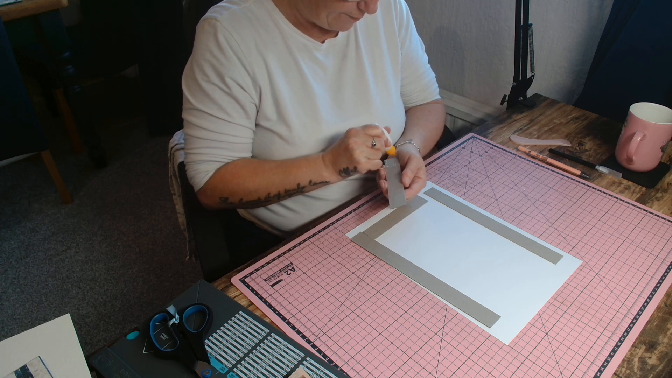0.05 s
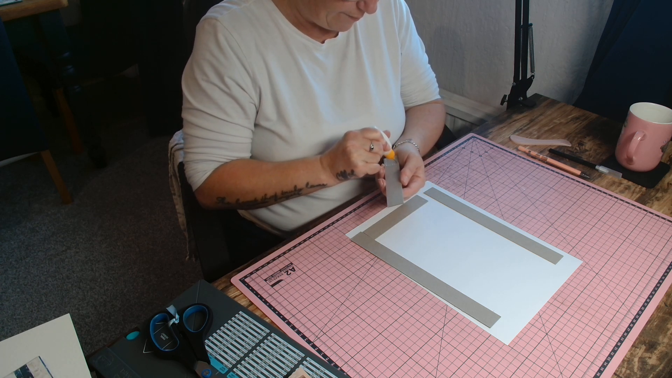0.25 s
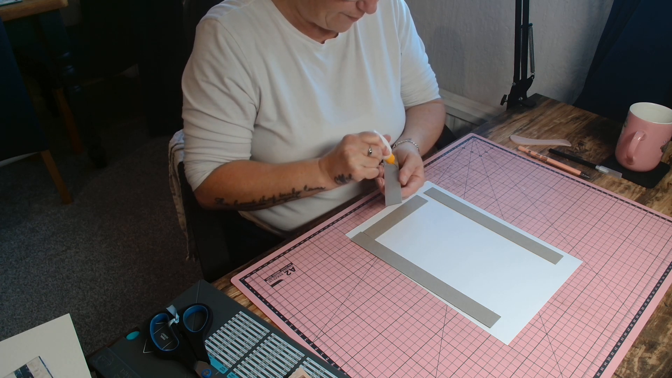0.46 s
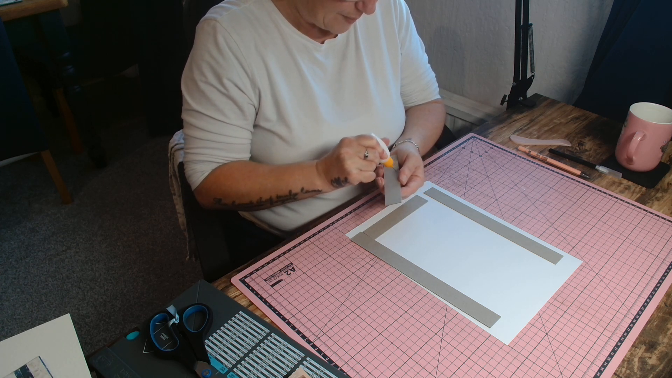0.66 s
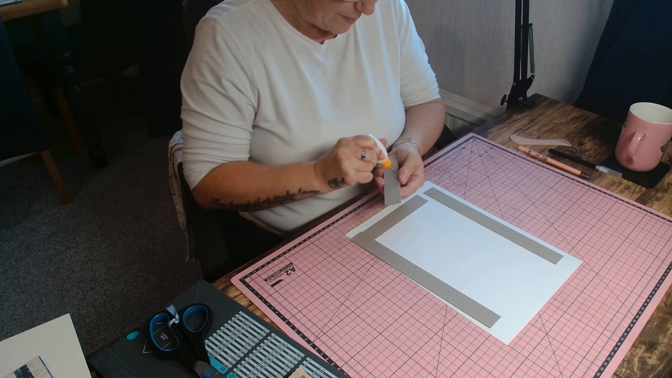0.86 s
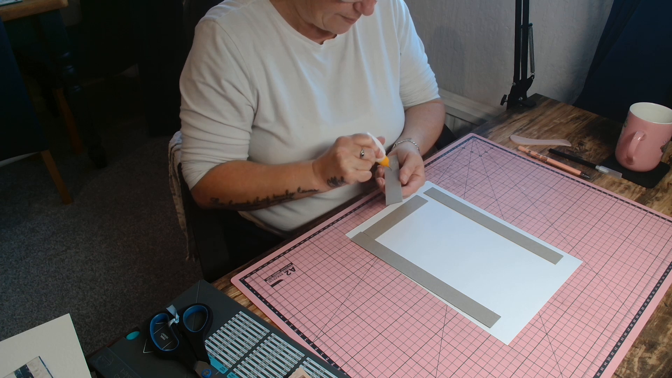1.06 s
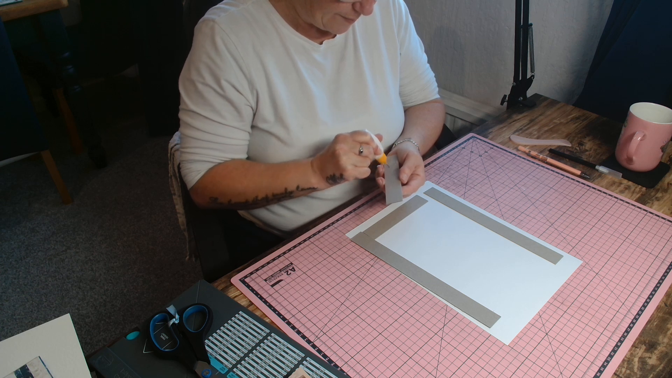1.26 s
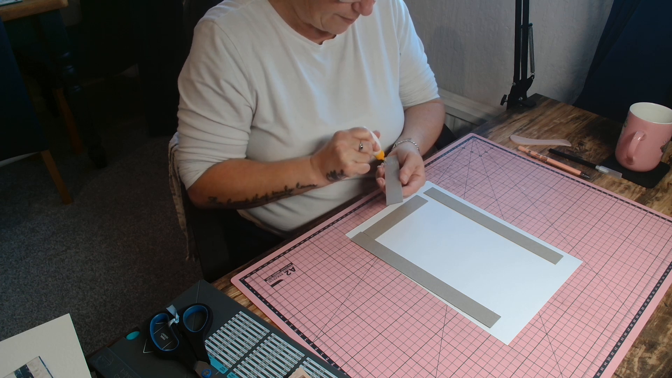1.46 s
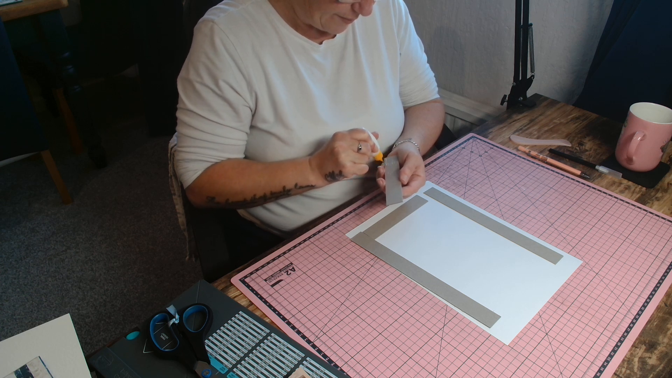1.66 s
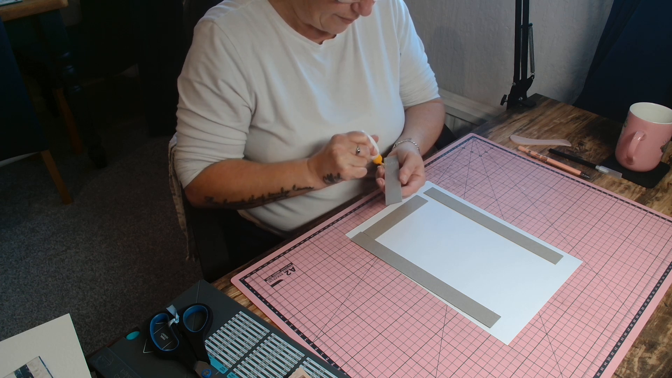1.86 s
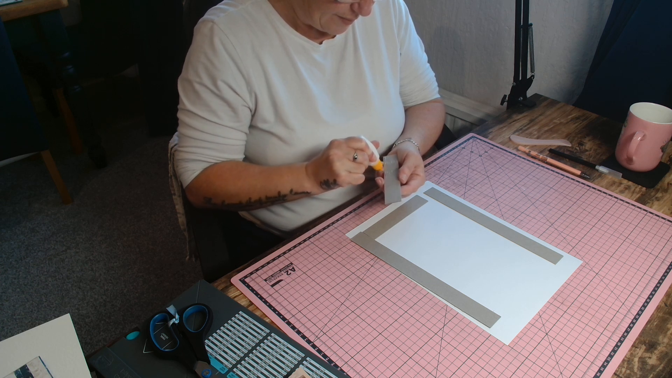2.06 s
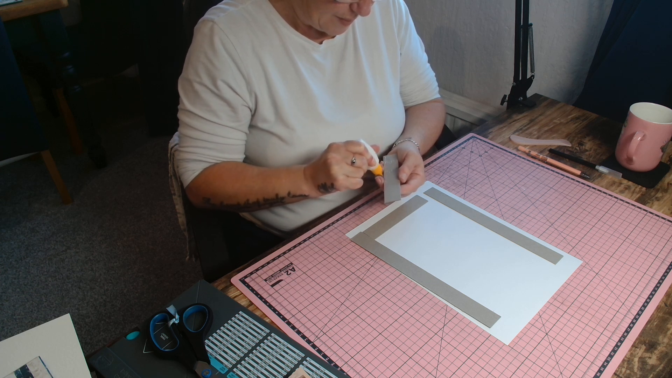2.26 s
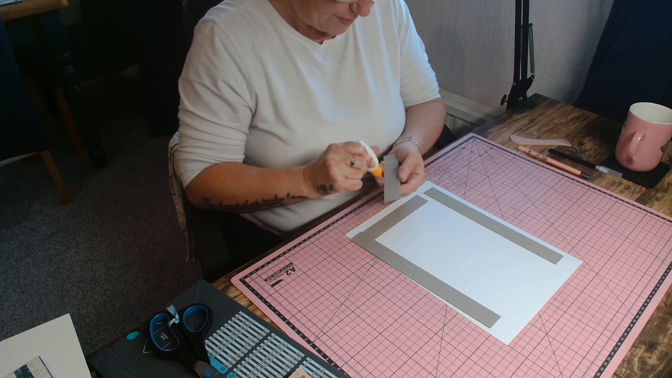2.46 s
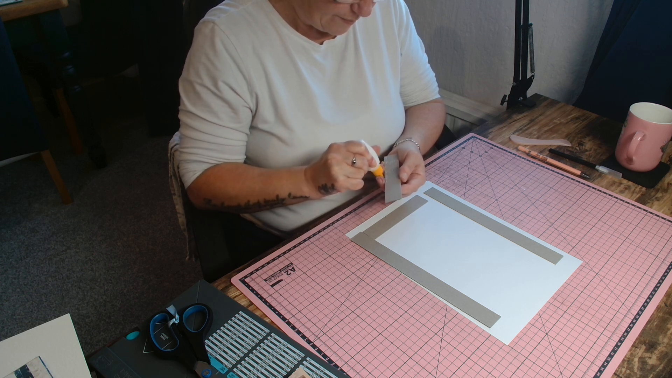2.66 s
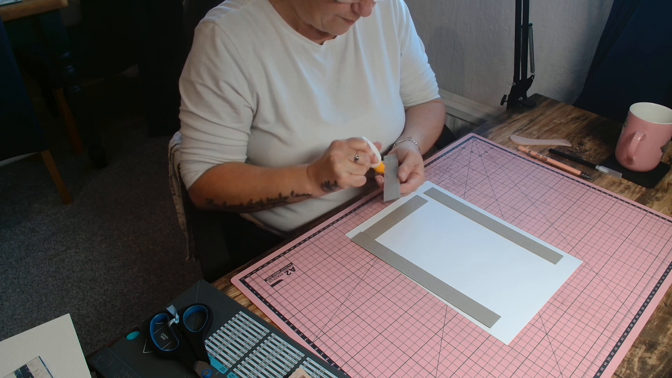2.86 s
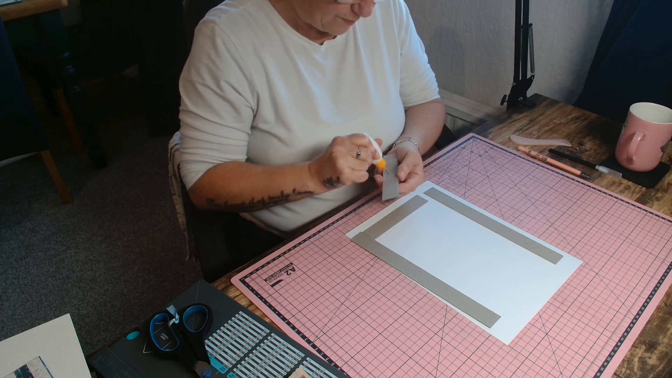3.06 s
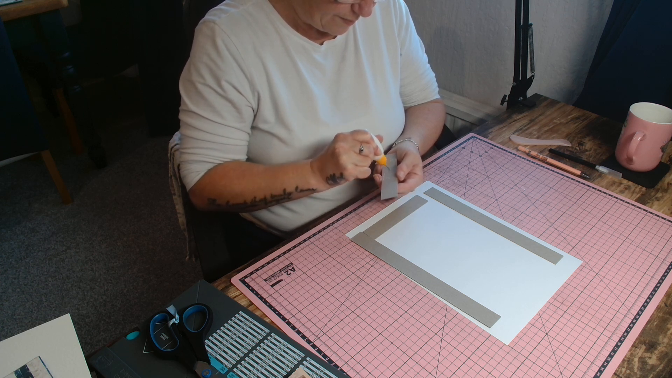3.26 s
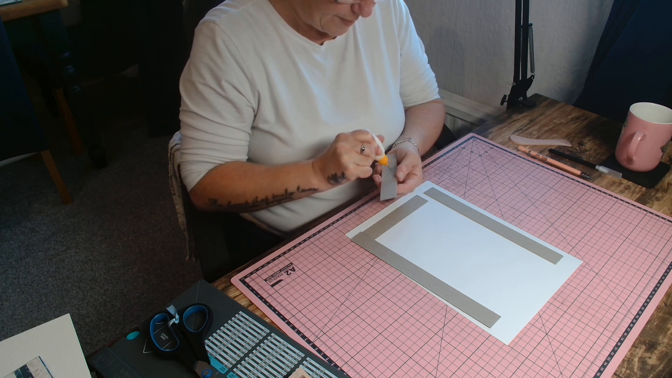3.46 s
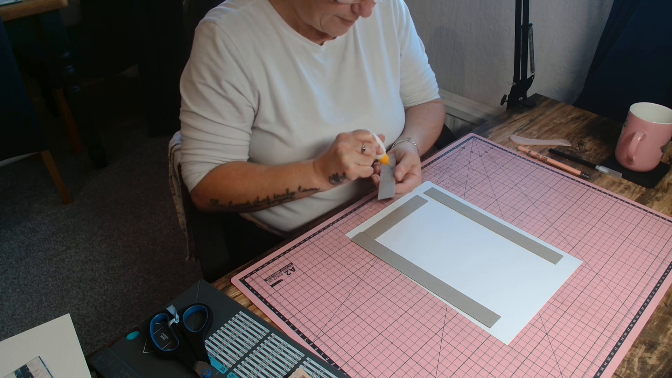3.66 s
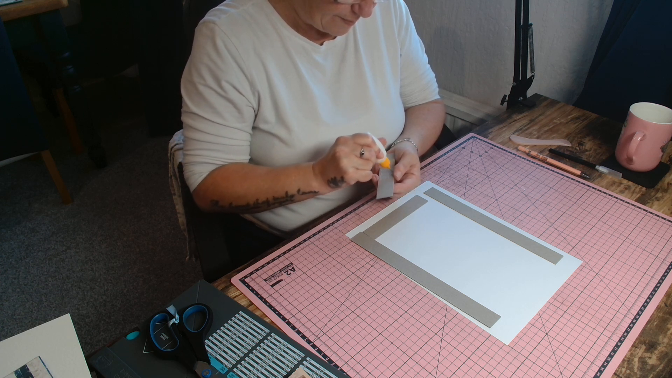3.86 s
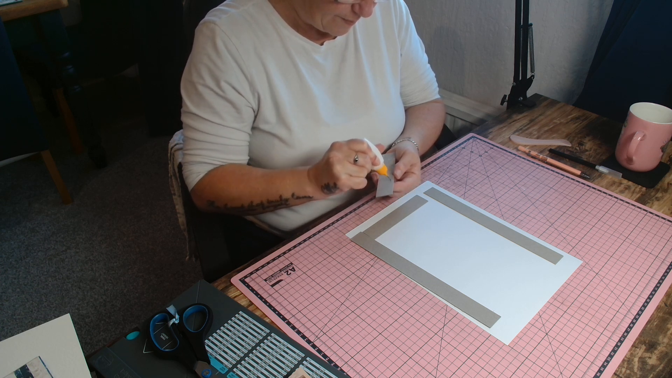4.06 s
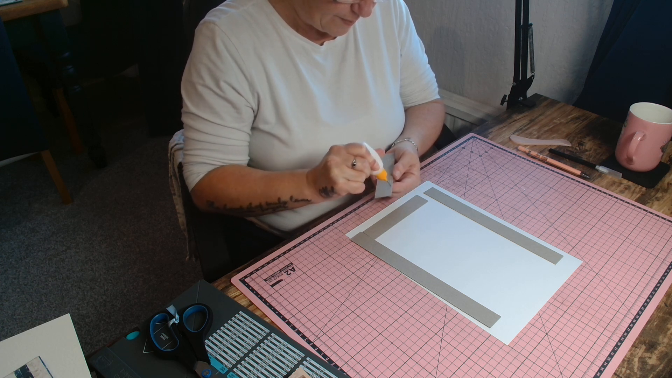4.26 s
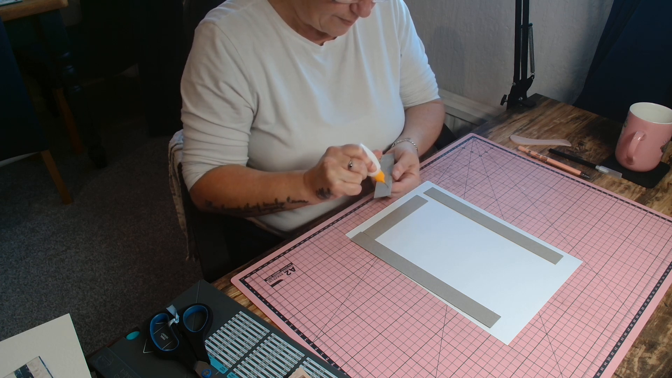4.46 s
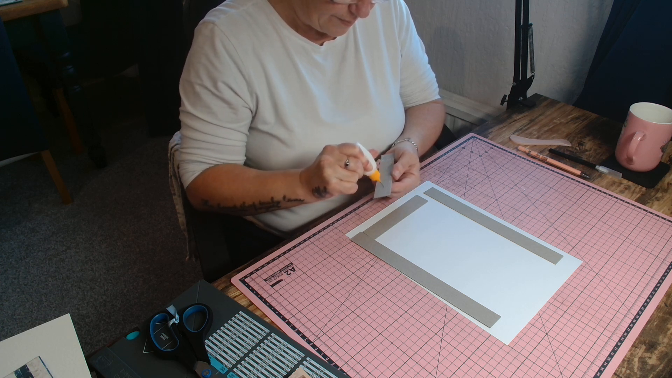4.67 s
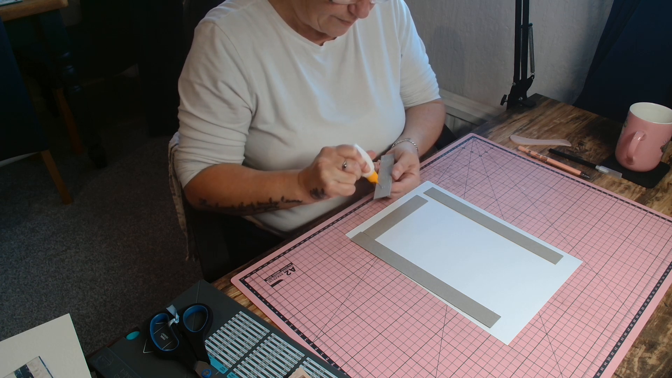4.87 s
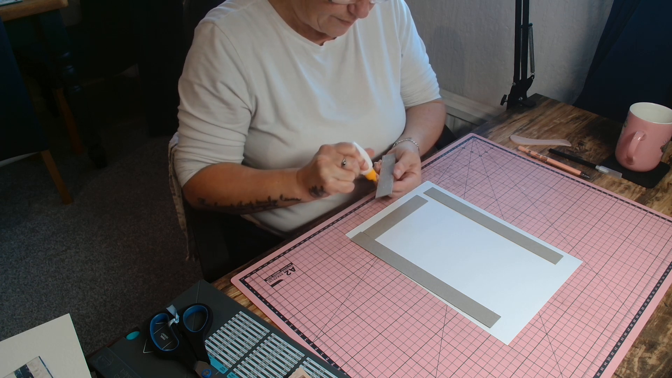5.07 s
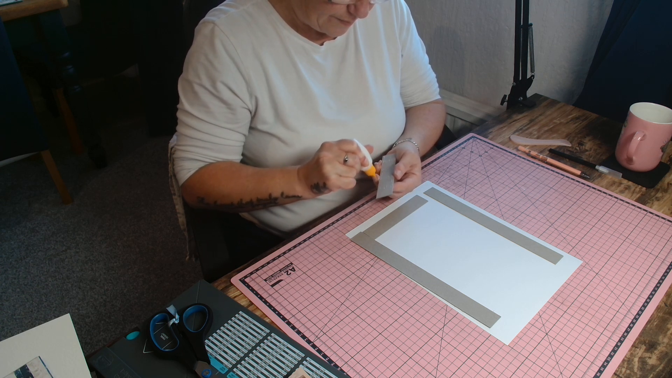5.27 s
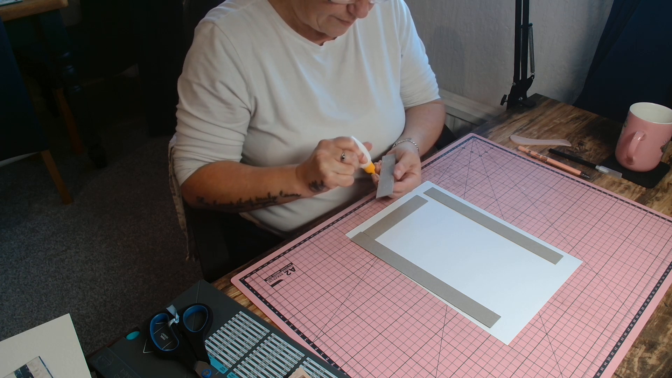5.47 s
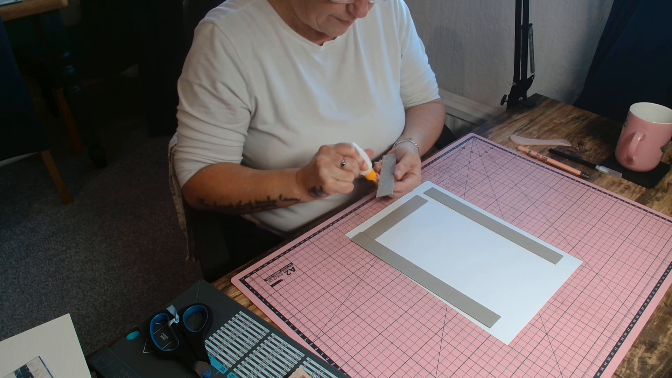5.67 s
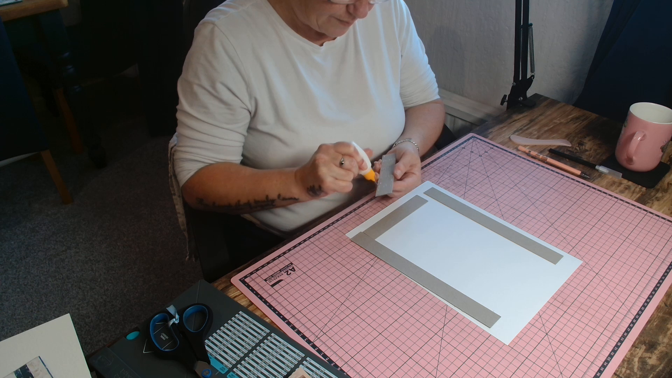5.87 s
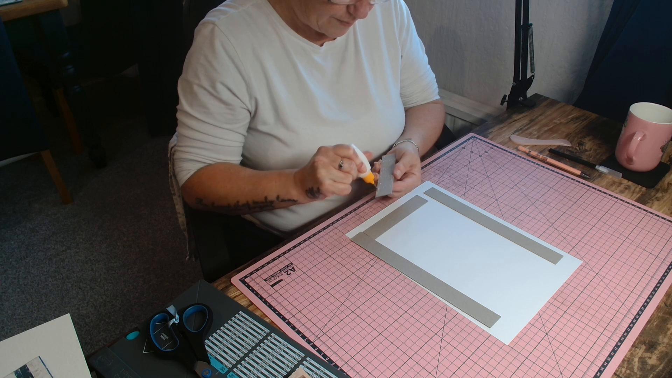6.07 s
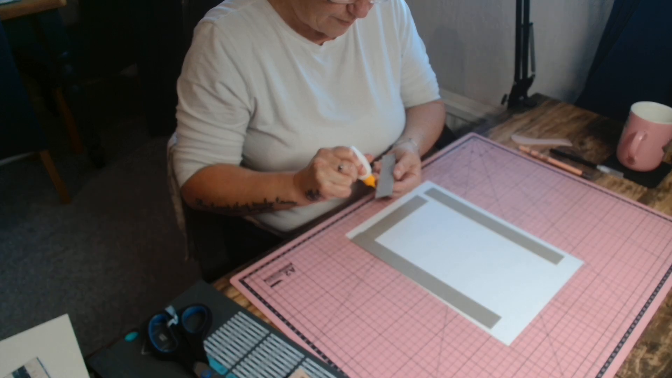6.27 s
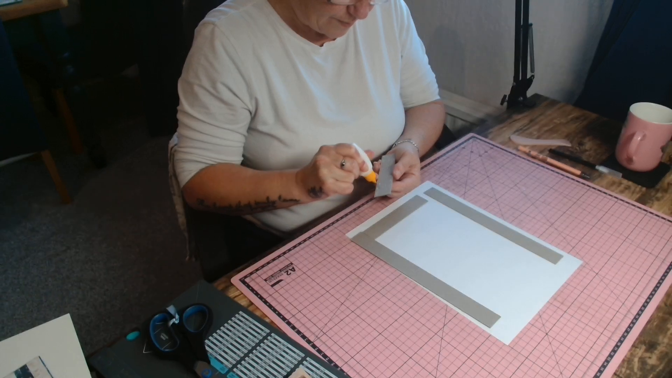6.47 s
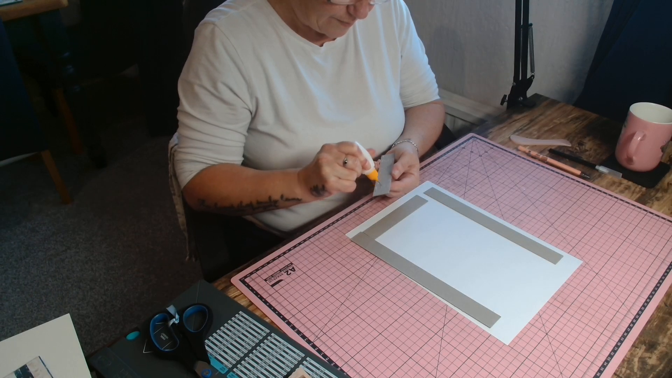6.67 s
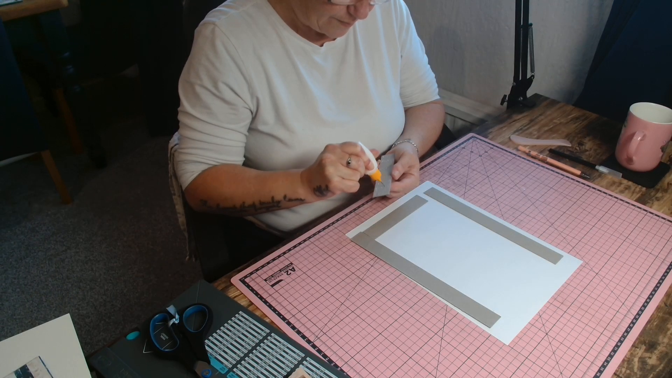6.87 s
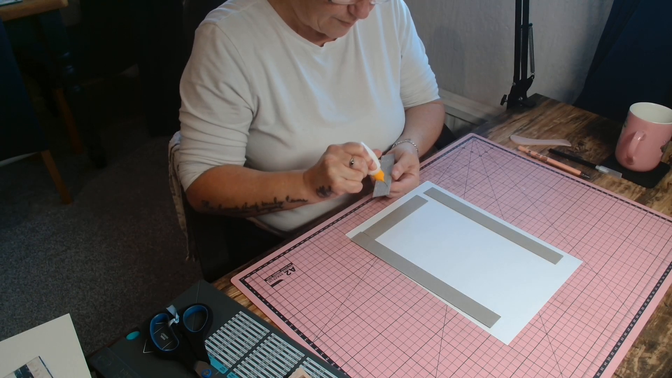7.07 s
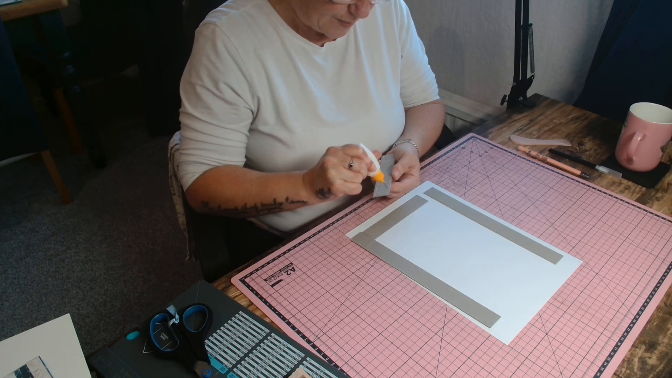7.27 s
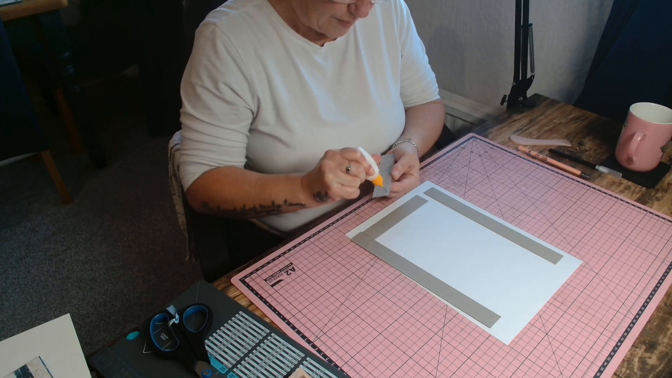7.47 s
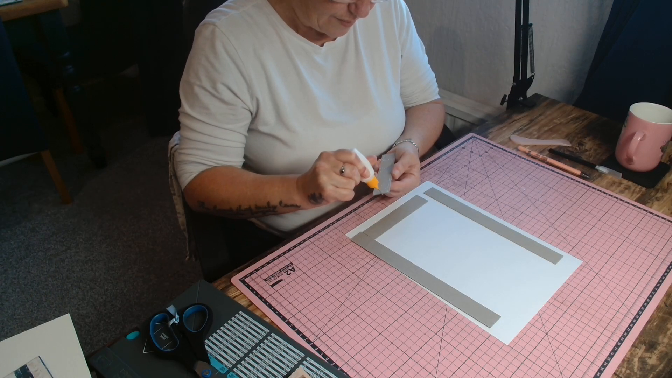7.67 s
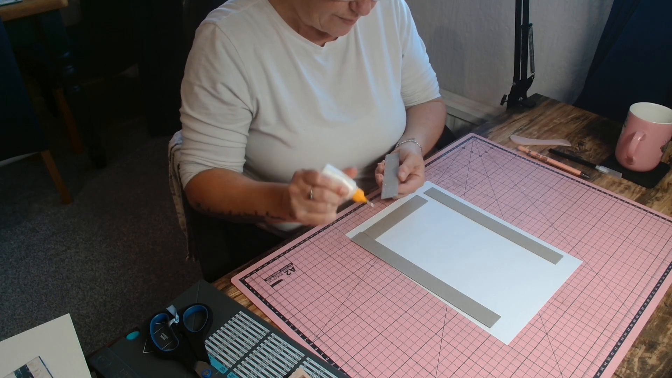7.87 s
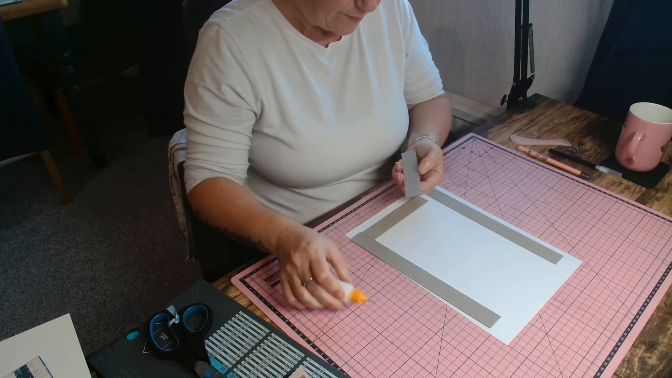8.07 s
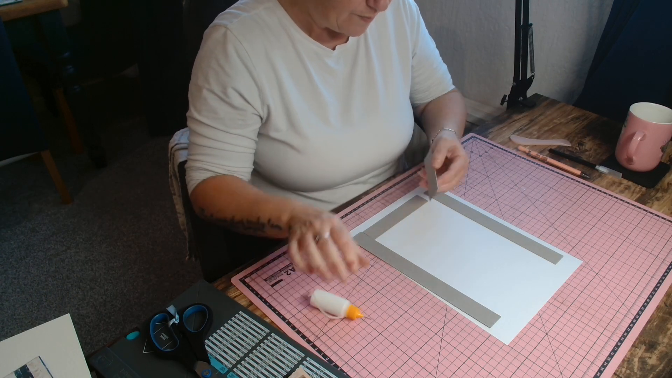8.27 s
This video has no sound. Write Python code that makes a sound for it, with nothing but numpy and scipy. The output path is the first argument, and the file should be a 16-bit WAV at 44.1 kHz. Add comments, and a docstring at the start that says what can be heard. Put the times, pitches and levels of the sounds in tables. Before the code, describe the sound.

A steady low hum and faint rumbling air lie under quick, scratchy strokes of plastic on thin card. The rubbing swells and eases, with irregular ticks, brief gaps, and faint creaks later on. A short springy card snap comes late, then more light rubbing, a pause, and one heavy wooden thump with a plastic knock, far louder than the rest. Close mono pickup, small dry room, softened treble.

```python
"""Glue nozzle on card

Close by, a glue bottle's nozzle is rubbed to and fro, about nine strokes a second, over a hand-held strip
of card: paper fibres slip under the tip and ring the strip. Short ticks and creaks break up the strokes.
The card flicks once as it pops through, then the bottle is set down on the craft table with a thump,
heard as damped table modes and noise bursts. Mains hum, a motor and rumbling air fill the small room."""
import sys
import numpy as np
from scipy import signal
from scipy.fft import rfft, irfft
from scipy.io import wavfile
from scipy.ndimage import uniform_filter1d, map_coordinates

SR = 44100
rng = np.random.default_rng(int(sys.argv[2]) if len(sys.argv) > 2 else 0)


def store_pcm(level_fs):
    """Save levels as 16-bit WAV."""
    pcm = np.round(np.clip(level_fs, -1, 1) * 32767).astype(np.int16)
    wavfile.write(sys.argv[1], SR, np.atleast_2d(pcm).T)


N = 366471
T = np.arange(N) / SR

# the nozzle lands on the strip or snags on its edge, after a moment off the card:
# start_s, level_db (before the ticks' common trim), pitch_hz, off_card_s
NOZZLE_TICKS = [(0.088, -36, 5700, .01), (0.562, -32, 1030, 0.05), (0.785, -42, 1340, .03),
                (1.13, -38, 1062, .003), (1.244, -43, 2200, 0.0096), (1.476, -39.5, 2700, .035),
                (2.181, -37, 1420, 0.087), (2.725, -30, 1267, 0.0056), (2.94, -42, 2660, 0.0067),
                (3.162, -38, 2000, 0.0059), (3.596, -43, 2660, .02), (3.929, -39, 2001, .02),
                (3.971, -36, 2660, .04), (4.072, -40, 1210, .02), (4.497, -33, 883, 0.0034),
                (5.578, -38, 1200, .01), (5.884, -39.5, 1730, .05), (6.358, -44, 1580, .02),
                (6.578, -35.5, 1070, .02), (7.011, -40, 1870, .03), (7.595, -33.5, 1040, 0.0022),
                (7.707, -32.5, 2600, 0.027)]


def undb(db):
    """Decibels to gain."""
    return 10 ** (np.asarray(db) / 20)


def unit(x):
    """Scale to rms 1."""
    return x / np.sqrt(np.mean(x ** 2))


def add(out, s, x):
    """Mix x into out from time s."""
    i = max(int(round(s * SR)), 0)
    out[i:i + len(x)] += x[:max(N - i, 0)]


def colour(x, points):
    """Filter by a smooth spectrum of (Hz, dB) points."""
    hz, db = np.transpose(points)
    f = np.fft.rfftfreq(2 ** 19, 1 / SR)
    gain = undb(np.interp(np.log(f + 1), np.log(hz), db))
    spectrum = rfft(x, 2 * len(f) - 2)
    return irfft(spectrum * gain)[:len(x)]


def band(x, lo_hz, hi_hz, order=2):
    """Band-pass between two edges."""
    return signal.sosfilt(signal.butter(order, [lo_hz, hi_hz], "band", fs=SR, output="sos"), x)


def resonance(x, hz, width_hz):
    """One resonance, gain 1 at its centre."""
    return signal.lfilter(*signal.iirpeak(hz, hz / width_hz, fs=SR), x)


def walk(rate):
    """Smooth random drift of spread near 1, through rate random points a second."""
    points = rng.standard_normal(4096)
    coarse = map_coordinates(points, [T[::32] * rate], order=3, mode="wrap")
    return coarse.repeat(32)[:N]


def fade(t60):
    """Half a second of exponential decay, falling 60 dB in t60 seconds."""
    return np.exp(-np.log(1000) * T[:SR // 2] / t60)


def ring(modes, pitch=1):
    """Damped modes after one blow."""
    out, below_hz = 0, 0
    for hz, db, t60 in modes:
        # a mode close above the one before starts against it, then the two beat
        sign = -1 if hz < 1.06 * below_hz else 1
        tone = np.sin(2 * np.pi * hz * pitch * T[:SR // 2])
        out = out + sign * undb(db) * fade(t60) * tone
        below_hz = hz
    return out


def burst(lo_hz, hi_hz, t60):
    """Many close modes dying away together, as decaying band noise."""
    return unit(band(rng.standard_normal(SR // 2), lo_hz, hi_hz)) * fade(t60)


def air(air_db=-53, flutter_db=0.5):
    """Uneven low rumble and faint steady hiss of the room."""
    # spectrum of the room air: pitch_hz, level_db per Hz (relative)
    air_points = [(8, -18), (15, -2.5), (30, 0.5), (42, -5), (58, -1.5), (80, -12.5), (130, -5), (200, -10),
                  (320, -13.5), (450, -20), (1000, -23), (2000, -30), (4000, -31.5), (7000, -39)]
    noise = unit(colour(rng.standard_normal(N), air_points))
    flutter = undb(flutter_db * walk(8.1)) - 1
    return undb(air_db) * (noise + band(noise, 15, 280) * flutter)


def hum(waver=.12):
    """Mains hum and a motor: sine lines, the unsteady ones wandering in level and phase."""
    # pitch_hz, level_db rms, unsteadiness_db
    hum_lines = [(58.3, -60, 4.5), (99.6, -61.5, 1.1), (114.9, -68, 2.5), (119.8, -53, 0.9),
                 (186, -70, 3.5), (199.1, -64.5, 0), (325, -74, 5.5)]
    out = np.zeros(N)
    for hz, db, shake_db in hum_lines:
        level = np.sqrt(2) * undb(db + shake_db * walk(4) / 2)
        wander = waver * shake_db * np.pi * walk(5)
        out += level * np.sin(2 * np.pi * hz * T + wander)
    return out


def room(x, wet_db=-12, t60=0.18):
    """A small carpeted room: a short diffuse echo behind the direct sound."""
    echo = rng.standard_normal(SR // 2) * fade(t60) * (T[:SR // 2] > .003)
    return x + undb(wet_db) * signal.fftconvolve(x, echo / np.linalg.norm(echo))[:N]


def forearms(rub, table_hz=326, width_hz=24, coupling_db=-16, follow=0.76):
    """The arms rest on the table, so the rubbing faintly stirs its strongest mode."""
    loudness = np.sqrt(np.abs(uniform_filter1d(rub ** 2, SR // 4)))
    # the arms' push varies less than the sound of the tip
    effort = loudness.max() * (loudness / loudness.max()) ** follow
    table = unit(band(rng.standard_normal(N), table_hz - width_hz / 2, table_hz + width_hz / 2))
    return undb(coupling_db) * effort * table


def fingers():
    """Dull swells of skin dragging on card and bottle as the grip shifts."""
    # middle_s, length_s, level_db, centre_hz
    grip_shifts = [(3.71, 0.14, -50.5, 496), (4, 0.12, -73, 340)]
    out = np.zeros(N)
    for s, length, db, hz in grip_shifts:
        swell = np.hanning(int(length * SR))
        drag = unit(band(rng.standard_normal(SR), hz / 1.6, hz * 1.6))
        add(out, s - length / 2, undb(db) * swell * drag[:len(swell)])
    return out


def creak(slips_per_s=85, jitter=0.21):
    """In light strokes the nozzle sticks and lets go in a short run of separate slips."""
    # start_s, length_s, level_db
    creak_runs = [(6.16, .11, -53.5), (6.8, .115, -51.5)]
    out = np.zeros(N)
    for start_s, length_s, slip_db in creak_runs:
        for k, (shift, size) in enumerate(rng.standard_normal((16, 2))):
            if k / slips_per_s < length_s:
                slip = undb(slip_db + 2 * size) * burst(1100, 5500, 0.0077)
                add(out, start_s + (k + jitter * shift) / slips_per_s, slip)
    return out


def flicks():
    """The bent strip buckles, pops through and rings for a moment."""
    # parts of the one flick: start_s, ring_db, snap_db, pitch_share of the modes
    flick_parts = [(6.4286, -34, -27.5, 1.05), (6.4355, -36.5, -36, 1.0), (6.4394, -39.5, -51, .99)]
    # modes of the strip: pitch_hz, level_db (relative), t60_s
    flick_modes = [(925, -7, 0.074), (1354, 7, 0.029), (1590, -21, 0.0094), (2360, -13, 0.057)]
    out = np.zeros(N)
    for s, ring_db, snap_db, pitch in flick_parts:
        snap = band(burst(2200, 4600, .007), 1500, 4800)
        add(out, s, undb(ring_db) * ring(flick_modes, pitch) + undb(snap_db) * snap)
    return out


def bottle(tail_db=-25, knock_tail_db=-8.0, shell_db=-14):
    """The base drives the table's modes; the bottle knocks and clicks, its shell rings, the room answers."""
    # the bottle lands, rim first and then flat: start_s, table_db, knock_db, plastic_click_db
    landing_blows = [(8.125, -69, -60, -60), (8.1406, -37, -36.5, -44), (8.157, -13, -22, -27),
                     (8.173, -46, -26, -35.5)]
    # table and cutting mat; the close pair near 140 Hz beats, so the boom swells late:
    # pitch_hz, level_db (relative), t60_s
    table_modes = [(80, -23, .4), (134, -8.5, .42), (141, -13, .44), (190, -6, .17), (246, -8.5, .21),
                   (322, -1, .16), (338, -10, .15), (436, -7.5, .13), (487, -16, .25), (554, -12, .16),
                   (645, -8, .06), (685, -12, .06), (767, -12, .11), (824, -15, .15), (864, -22, .2),
                   (957, -17, .12), (1100, -24, .17), (1198, -19, .08), (1371, -21, .06)]
    out = np.zeros(N)
    # pushed down first; the top radiates little deep bass, and the soft mat takes off the treble
    table = -band(ring(table_modes), 85, 1400)
    for s, table_db, knock_db, click_db in landing_blows:
        knock = burst(420, 860, 0.052) + undb(knock_tail_db) * burst(460, 920, 0.22)
        knock = band(knock, 290, 1700)
        shell = undb(shell_db) * burst(4400, 6000, 0.035)
        room_tail = undb(tail_db) * burst(900, 7100, 0.18)
        click = burst(1050, 3100, 0.0071) + shell + room_tail
        add(out, s, undb(table_db) * table + undb(knock_db) * knock + undb(click_db) * click)
    return out


def ticks(tick_db=-8.5, t60_s=.014):
    """Short dry ticks of plastic on a paper edge, as bursts of noise."""
    out = np.zeros(N)
    for s, db, hz, _ in NOZZLE_TICKS:
        add(out, s, undb(db + tick_db) * burst(hz / 1.7, min(hz * 3, SR / 6), t60_s))
    return out


def contact(settle_s=.002):
    """Gate of the rubbing: 1 with the nozzle on the card, dipping just before each tick."""
    sliding = np.ones(N)
    for s, _, _, off_s in NOZZLE_TICKS:
        sliding[(T > s - off_s) & (T < s)] = 0
    return uniform_filter1d(sliding, max(int(settle_s * SR), 1))


def strokes(rise_share=0.46, fall_share=.51):
    """The hand swings to and fro: tip speed, and each stroke's lean in dB for body, rasp and hiss."""
    # runs of even strokes; the tip leans, so the two directions differ in colour:
    # first_middle_s, last_middle_s, strokes_per_s (approximate), stroke_length_s,
    # first direction's extra body_and_rasp_db, its extra hiss_db
    stroke_runs = [(0.02, 2.068, 8.8, .123, -.5, -3), (2.181, 3.865, 8.9, .111, -1.2, 1),
                   (4, 5.27, 9.5, .12, 0.5, 2), (5.693, 6.396, 9.8, 0.093, -1, 1.2),
                   (6.497, 7.69, 9.2, 0.1, -0.9, .5)]
    speed, lean_db = np.zeros(N), np.zeros((3, N))
    for first, last, rate, length, body_db, hiss_db in stroke_runs:
        count = int(round((last - first) * rate)) + 1
        for k, middle in enumerate(np.linspace(first, last, count)):
            i, j = np.searchsorted(T, [middle - length / 2, middle + length / 2])
            along = (T[i:j] - middle) / length + .5
            # speeds up, holds briefly, slows down
            ramp = np.clip(np.minimum(along / rise_share, (1 - along) / fall_share), 0, 1)
            speed[i:j] = np.maximum(speed[i:j], np.sin(np.pi / 2 * ramp))
            # the way back leans by the opposite amount
            lean_db[:, i:j] = (-1) ** k * np.array([[body_db], [body_db], [hiss_db]])
    return speed, lean_db


def strip(force, edge_echo=0.36):
    """The card's answer to a force at the nozzle: an edge echo, resonances and a broad colour."""
    # broad colour of the rubbed strip: pitch_hz, level_db per Hz (relative)
    card_points = [(200, -22.5), (330, -3), (450, -4), (700, 0), (1100, 0), (1900, 2), (2540, -5.5),
                   (2750, -3), (3750, -9), (4600, -1.5), (4950, -9), (5300, -2.5), (6200, -4), (8000, -16)]
    # resonances, which change with each new hold: from_s, until_s, pitch_hz, width_hz, gain_db (before colour)
    card_peaks = [(0, 2.4, 960, 120.7, -12.5), (0, 2.5, 1320, 72.3, -13), (0, 2.3, 2064, 130, 4),
                  (.55, 1.55, 2800, 113, -1), (.55, 1.55, 3110, 441, -1.5), (0, 2.6, 3450, 247, -5.5),
                  (0, 2.15, 4500, 243, 0.5), (2.15, 3.92, 1255, 169.6, -5.5), (2.15, 3.92, 1970, 78, 6),
                  (2.15, 3.92, 2168, 99, 1), (2.15, 3.92, 2660, 80, 6), (2.15, 3.92, 3790, 90, 1),
                  (2.15, 3.5, 4400, 249, -5.5), (2.15, 3.92, 5300, 346, -2), (3.92, 8, 982, 131, -4),
                  (3.92, 8, 2064, 133, 9), (3.92, 6.45, 2680, 112, -1.5), (3.92, 6.45, 3270, 130, 1.5),
                  (3.92, 6.45, 3530, 152, 1.5), (3.92, 5.45, 5020, 168, 5.5), (5.45, 6.45, 1930, 100, -2),
                  (5.45, 6.45, 2420, 190, 2), (6.45, 8, 905, 160, 3.5), (6.45, 8.8, 1940, 69, -1),
                  (6.45, 8, 3310, 260, 7.5), (6.45, 8, 3950, 200, 0), (6.45, 8, 4960, 150, 0.5)]
    # bending waves return from the strip's edge over a path that drifts
    lag = SR * np.abs(0.00078 + 0.00026 * walk(14))
    force = force + edge_echo * np.interp(np.arange(N) - lag, np.arange(N), force)
    out = force.copy()
    for start, end, hz, width, db in card_peaks:
        hold = slice(max(int(start * SR), 0), int(end * SR))
        out[hold] += undb(db) * resonance(force[hold], hz, width)
    return colour(out, card_points)


def rubbing(slips_per_s=6000, scatter_db=2.5, smooth=0.33, catch_db=.9, rock_db=1.67,
            body_power=1.77, rasp_power=1.54, hiss_power=1.76, rub_db=0.37):
    """Fibres slip under the nozzle and ring the strip, more often and louder the faster it moves."""
    # how hard the nozzle is pressed on: time_s, level_db (before rub_db)
    pressure_points = [(0.02, -55), (0.13, -53.0), (0.24, -55.5), (0.47, -55.0), (1.05, -49.0),
                       (1.39, -49.0), (1.96, -56.5), (2.07, -61.5), (2.4, -57.5), (2.51, -52.0),
                       (3.3, -48.0), (3.42, -52.5), (3.75, -51.0), (3.87, -59.0), (4.0, -53.5),
                       (4.2, -56.5), (4.84, -49), (5.27, -55.5), (5.69, -63.5), (5.9, -59), (6.29, -62),
                       (6.4, -55.5), (6.82, -55.0), (6.92, -59.5), (7.37, -58.5), (7.7, -59.5)]
    # tone of the rubbing, as levels of its three bands: time_s, card_body_db, rasp_db, fibre_hiss_db
    tone_points = [(0.02, -0.5, -1.5, 3), (0.24, 4.0, -1.5, -4), (1.05, 1.5, 2.0, -5.5),
                   (1.28, 0.0, 3.5, -6.5), (1.84, 0, 0, -1.5), (2.28, 4.0, -1, -4), (2.63, 1, 1.5, -5),
                   (3.3, -2, 4.0, -1.5), (3.87, 3.0, -0.0, -4.5), (4.31, 2.0, -1.0, -1.5),
                   (5.27, 1.5, -0.5, -2), (5.79, -0.5, 2, -2.5), (5.99, 3, -2.5, -6.0),
                   (6.4, 2.5, 2.5, -6.5), (6.71, 0.5, -0.5, -2.0), (7.03, 3, -0.5, -5), (7.7, 0.5, 0, -1)]
    speed, lean_db = strokes()
    slipping = rng.random(N) < slips_per_s * (.3 + speed) / SR
    sizes = undb(scatter_db * np.minimum(rng.exponential(size=N), 5)) * rng.choice([-1, 1], N)
    force = unit(slipping * sizes) + smooth * rng.standard_normal(N)
    card = strip(force * undb(catch_db * walk(170)))
    body = band(card, 250, 2086, order=6)
    rasp = band(card, 2055, 4162, order=6)
    hiss = band(card, 3930, 7740, order=6)
    pressure_db = np.interp(T, *np.transpose(pressure_points))
    times, *tone_db = np.transpose(tone_points)
    powers = body_power, rasp_power, hiss_power
    out = 0
    for k, (part, power) in enumerate(zip((body, rasp, hiss), powers)):
        # a new hold changes the strip's colour, not its loudness
        even = part / np.sqrt(uniform_filter1d(part ** 2, SR // 4))
        # the tip rocks within a stroke, shifting the weight between body, rasp and hiss
        db = pressure_db + np.interp(T, times, tone_db[k]) + lean_db[k] + rock_db * walk(40)
        out = out + even * speed ** power * undb(db)
    return undb(rub_db) * out * contact()


def scene():
    """Handwork at the table over the hum and air of the room."""
    rub = rubbing()
    close_work = rub + ticks() + creak() + fingers()
    handwork = room(close_work, wet_db=-10) + forearms(rub) + flicks()
    return (handwork + bottle() + hum() + air())[None]


def record(dry, top_hz=7500):
    """A narrow-band mono microphone whose treble falls away steeply around top_hz."""
    low_pass = signal.firwin(91, top_hz, window=("kaiser", 6), fs=SR)
    return signal.fftconvolve(dry, low_pass[None], "same", axes=1)


dry = scene()
out = record(dry)
store_pcm(out)
```